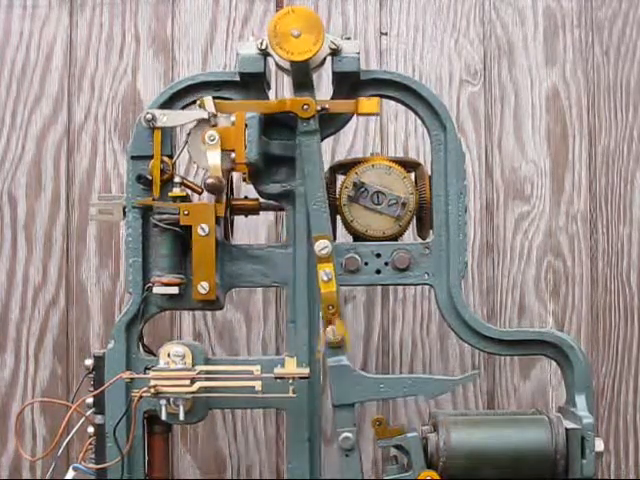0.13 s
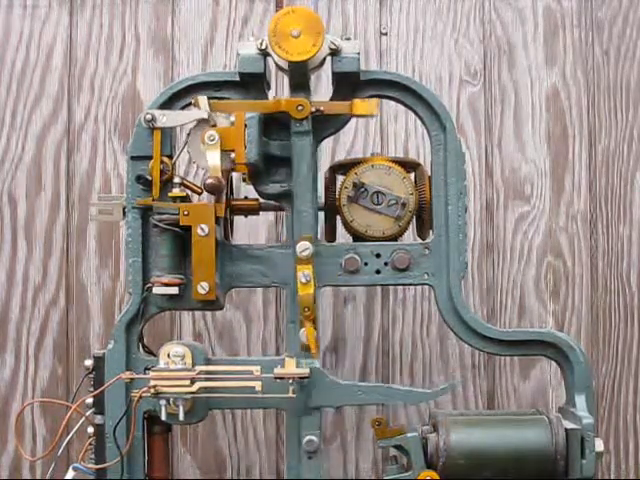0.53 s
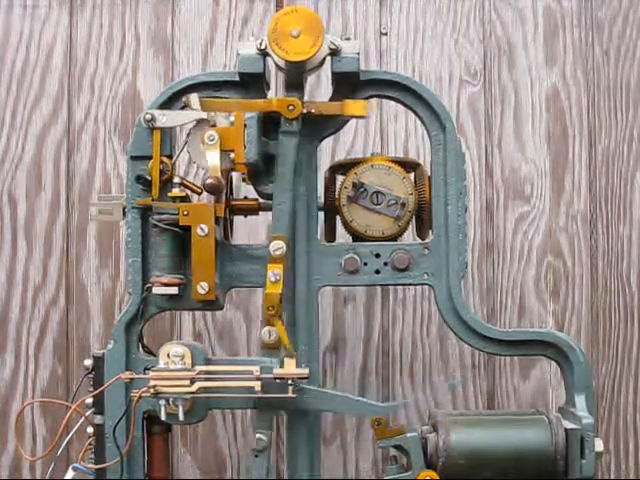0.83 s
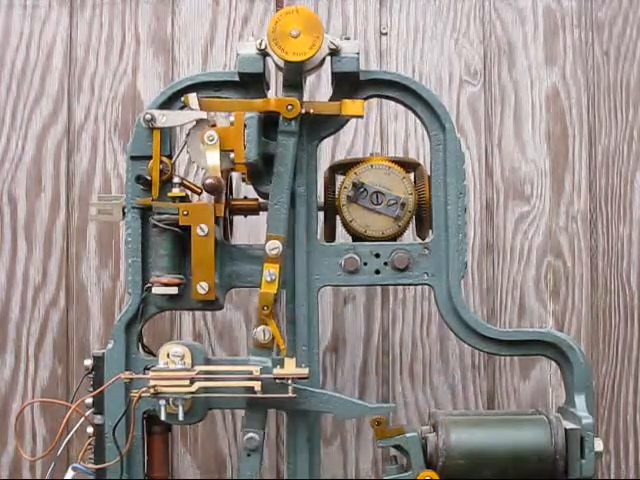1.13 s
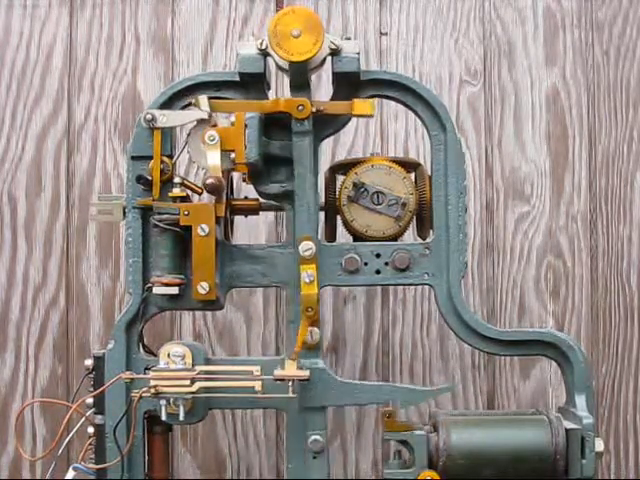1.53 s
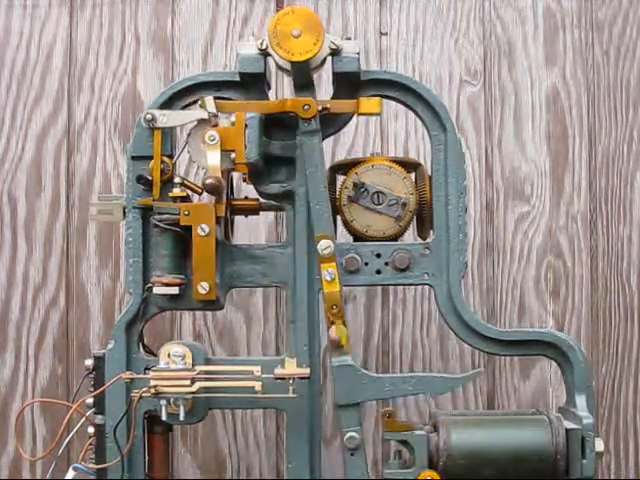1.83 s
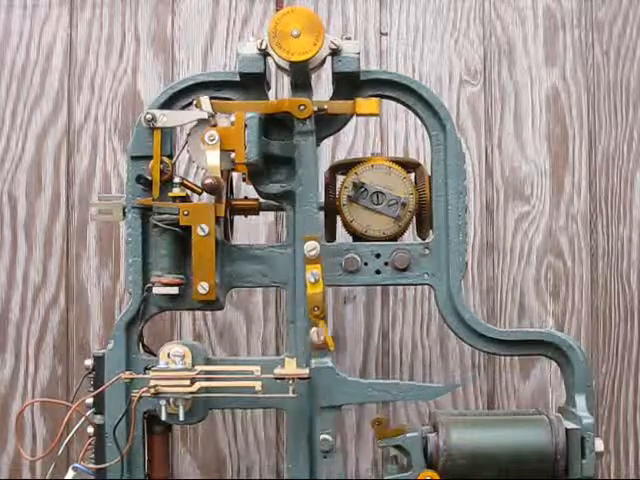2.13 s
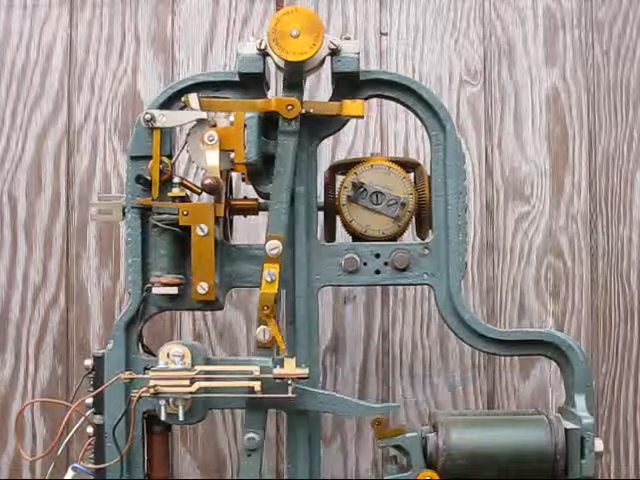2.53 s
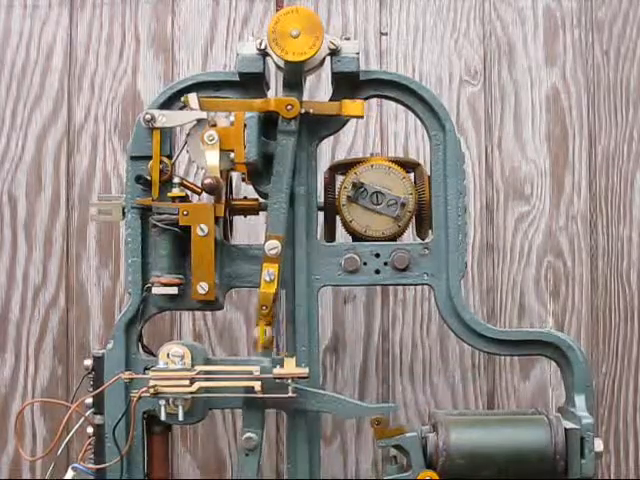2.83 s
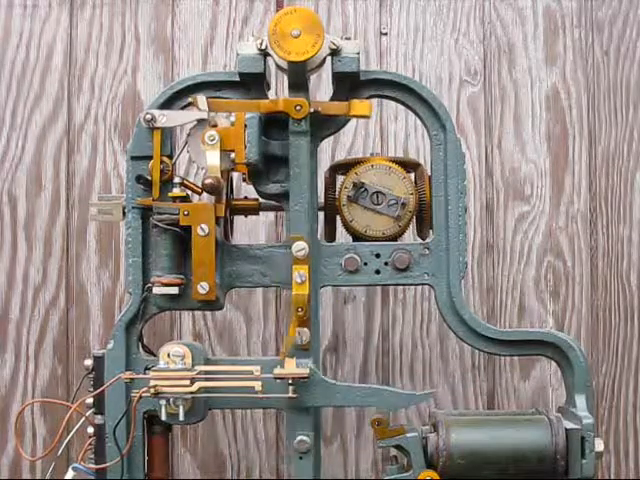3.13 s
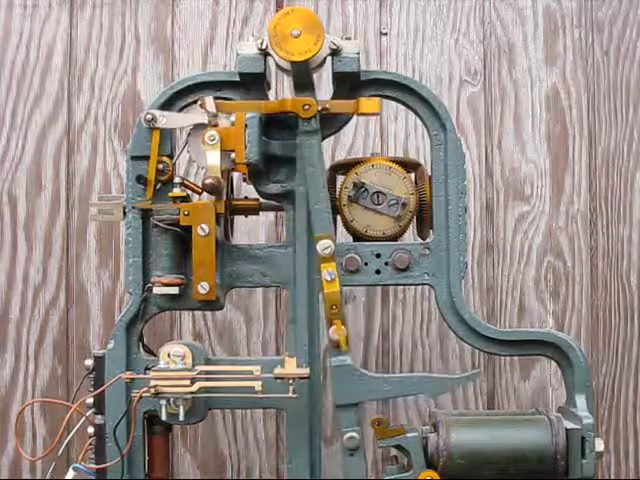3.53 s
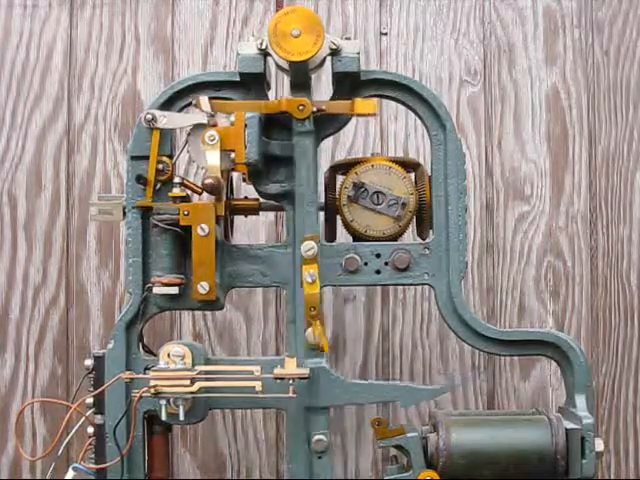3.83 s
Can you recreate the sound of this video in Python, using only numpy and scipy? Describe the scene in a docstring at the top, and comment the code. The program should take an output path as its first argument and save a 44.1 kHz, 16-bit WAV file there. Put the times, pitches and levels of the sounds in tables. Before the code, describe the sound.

Wind buffets the microphone throughout, in lumpy low gusts and hard puffs, strongest near 0.2 and 2.6 s, easing after 3.4 s, over steady rumble and faint hiss. A pendulum clock makes irregular bright ticks, some with a brief high spring ring, until 3.3 s. Metal levers clack dully at 1.5, louder at 2.13, sharply at 3.24, faintly at 3.95. Soft rubbing hisses from 2.6 to 3.4 s.

```python
"""Wind buffets a microphone from the start: gusts of lumpy noise and hard puffs, over a steady low rumble and
faint hiss. An electric pendulum clock ticks through it: bright noise snaps, with two decaying sines for the
pawl and contact springs. From 1.5 s levers clack on the iron frame, and at 3.24 s a magnet resets: noise bursts
for thud, knock and crack, and decaying sines for the modes. From 2.6 s something rubs softly for a moment: hiss
with gliding narrow-band noise. The loudest peaks drive a limiter."""
import sys
import numpy as np
from scipy import signal
from scipy.fft import rfft, irfft
from scipy.io import wavfile
from scipy.ndimage import uniform_filter1d, minimum_filter1d

SR = 44100
rng = np.random.default_rng(int(sys.argv[2]) if len(sys.argv) > 2 else 0)


def transcribe(signal):
    """Save signal, clipped to [-1, 1], as a 16-bit WAV file at the path in sys.argv[1]."""
    frames = np.atleast_2d(signal).T
    limited = np.clip(frames, -1, 1)
    pcm = np.round(limited * 32767).astype(np.int16)
    wavfile.write(sys.argv[1], SR, pcm)


N = 176400


def from_db(db):
    """Decibels to amplitude gain."""
    return 10 ** (np.asarray(db) / 20)


def rms_one(x):
    """Scale to unit rms."""
    return x / np.sqrt(np.mean(x ** 2) + 1e-20)


def in_time(rows):
    """Interpolate each column after t/s at every sample."""
    t_s, *columns = np.transpose(rows)
    return [np.interp(np.arange(N) / SR, t_s, column) for column in columns]


def colour(x, spectrum):
    """Filter by a spectrum, dB linear in log f; white noise keeps its power."""
    f_hz, density_db = np.transpose(spectrum)
    bins_hz = np.arange(N // 2 + 1) * SR / N + 1e-3
    gain = from_db(np.interp(np.log(bins_hz), np.log(f_hz), density_db))
    return irfft(rfft(x) * rms_one(gain), N)


def noise(spectrum):
    """Coloured Gaussian noise of unit rms."""
    return colour(rng.standard_normal(N), spectrum)


def drift(hz):
    """Smooth random motion of unit rms: white noise through a double real pole."""
    r = np.exp(-2 * np.pi * hz / SR)
    settled = signal.lfilter([1], [1, -2 * r, r * r], rng.standard_normal(N + SR))[SR:]
    return rms_one(settled)


def strikes(t_s, level_db):
    """One impulse per blow."""
    hits = np.zeros(N)
    hits[np.clip((t_s * SR).astype(int), 0, N - 1)] = from_db(level_db)
    return hits + 1e-18


def ring(hits, hz, t60_s):
    """Damped resonator: a unit impulse starts a decaying sine of height 1."""
    r = from_db(-60 / (t60_s * SR))
    w = 2 * np.pi * hz / SR
    return signal.lfilter([0, np.sin(w)], [1, -2 * r * np.cos(w), r * r], hits)


def decaying_power(hits, t60_s):
    """Power that jumps at each blow and falls 60 dB in t60."""
    return signal.lfilter([1], [1, -from_db(-120 / (t60_s * SR))], hits ** 2)


def burst(hits, spectrum, t60_s, tail_db, tail_t60_s):
    """Countless short modes: noise that dies fast after each blow, plus a weaker, longer tail."""
    fast = decaying_power(hits, t60_s)
    slow = decaying_power(hits, tail_t60_s)
    return noise(spectrum) * np.sqrt(fast + from_db(tail_db) ** 2 * slow)


def turbulence(spectrum, lumps):
    """Lumpy noise with its power evened out over a few hundredths of a second."""
    x = colour(rng.standard_normal(N) * lumps, spectrum)
    power = uniform_filter1d(uniform_filter1d(x ** 2, size=1100), size=1100)
    return x / np.sqrt(power + 1e-9)


# air strength at the microphone, before layer offsets: t/s, level/dB
GUST_LEVEL = [(0.0, -23.5), (.15, -16), (.27, -23.5), (.38, -28), (.42, -21), (.57, -25), (.68, -23),
              (.72, -28), (.85, -23), (1.12, -21), (1.16, -49), (1.29, -20.5), (1.44, -18.5), (1.5, -37.5),
              (1.58, -24), (1.98, -37.5), (2.11, -19.5), (2.16, -39), (2.21, -15), (2.34, -16.5),
              (2.37, -42), (2.46, -19.5), (2.52, -45), (2.6, -14.5), (2.87, -34.5), (3.05, -18), (3.2, -22),
              (3.27, -41), (3.38, -22.5), (3.42, -49), (3.75, -45.5), (3.87, -27.5), (4.0, -32.5)]
# relative power densities of the three wind layers: f/Hz, density/dB
BUFFET_SPECTRUM = [(50, -15), (110, -2.5), (180, 1.5), (310, 1.5), (450, -8), (650, -17.5), (1300, -65)]
RUMBLE_SPECTRUM = [(20, -38), (50, -12), (100, -3.5), (150, -3), (260, -11.5), (600, -87)]
FLUTTER_SPECTRUM = [(250, -10), (420, -1.5), (550, -6), (800, -9), (1100, -19.5), (1600, -34), (5000, -72)]
BUFFET_DB, RUMBLE_DB, FLUTTER_DB = -0.5, -6.5, -13.5  # re gust
# small, quick eddies flutter; big, slow ones rumble
EDDY_HZ, RUMBLE_DB_PER_OCTAVE, FLUTTER_DB_PER_OCTAVE = 321.4, -16.5, 18
LUMPS_HZ, LUMPY_DB = 72, 5
SWIRL_HZ, BUFFET_SWIRL_DB, FLUTTER_SWIRL_DB = 38, 2.5, 5.5


def wind():
    """Gusts break into swirls at the microphone that swing the flutter more than the buffeting and rumble."""
    gust_db, = in_time(GUST_LEVEL)
    _, puff_hz = in_time(PUFF_EVENTS)
    octaves = uniform_filter1d(np.log2(puff_hz / EDDY_HZ), size=3000)
    rumble_db = RUMBLE_DB + RUMBLE_DB_PER_OCTAVE * octaves
    flutter_db = FLUTTER_DB + FLUTTER_DB_PER_OCTAVE * octaves
    lumps = from_db(LUMPY_DB * drift(LUMPS_HZ))
    swirl = drift(SWIRL_HZ)
    swirl = rms_one(np.tanh(swirl - uniform_filter1d(swirl, size=3000)))
    layers = [(BUFFET_DB, BUFFET_SPECTRUM, BUFFET_SWIRL_DB),
              (rumble_db, RUMBLE_SPECTRUM, BUFFET_SWIRL_DB),
              (flutter_db, FLUTTER_SPECTRUM, FLUTTER_SWIRL_DB)]
    out = np.zeros(N)
    for layer_db, spectrum, swing_db in layers:
        swing = rms_one(from_db(swing_db * swirl))
        out += from_db(gust_db + layer_db) * swing * turbulence(spectrum, lumps)
    return out


# relative power density of the background: f/Hz, density/dB
BACKGROUND_SPECTRUM = [(20, -10.5), (70, 6), (140, -1), (280, -22), (600, -12.5), (900, -13), (1500, -20),
                       (2600, -25), (5000, -30), (11400, -35.5), (16000, -47.5)]
BACKGROUND_DB = -38  # rms


def background():
    """Low rumble and faint hiss: steady coloured noise."""
    return from_db(BACKGROUND_DB) * noise(BACKGROUND_SPECTRUM)


# pawl and springs: t/s, snap level/dB, lower ring level/dB, upper ring level/dB
TICK_EVENTS = [(.006, -23, -29, -43), (0.681, -41, -26.5, -29), (.754, -37, -39, -46),
               (0.957, -25.5, -36, -45), (1.34, -35.5, -45, -49), (2.3306, -27.5, -26.5, -30.5),
               (2.432, -29.5, -36, -51), (2.4558, -42.5, -43, -62), (2.593, -29, -41, -49),
               (2.609, -33.5, -48, -54), (2.997, -31, -36, -43), (3.168, -27, -30, -32),
               (3.339, -26.5, -33.5, -54)]
# lower and upper spring ring: f/Hz, t60/s
SPRING_RINGS = [(4600, 0.046), (5884, 0.08)]
# relative power densities of the plain snap and of the upper ring's snap: f/Hz, density/dB
SNAP_SPECTRUM = [(3000, -1.5), (6800, -19), (8300, 10), (9800, -1.5), (11500, 3), (13200, -11),
                 (16000, -28)]
SPRING_SNAP_SPECTRUM = [(3000, -11), (7000, -10), (12000, -7), (16000, -9)]
SPRING_SNAP_DB = 2.5  # re upper ring
SNAP_T60_S, SNAP_TAIL_DB, SNAP_TAIL_T60_S = 0.018, -14.5, 0.11


def ticks():
    """A bright snap leaves a spring ringing on two notes; the upper note brings a broader snap."""
    t_s, snap_db, lower_db, upper_db = np.transpose(TICK_EVENTS)
    out = np.zeros(N)
    for level_db, (hz, t60_s) in zip((lower_db, upper_db), SPRING_RINGS):
        out += ring(strikes(t_s, level_db), hz, t60_s)
    snaps = (snap_db, SNAP_SPECTRUM), (upper_db + SPRING_SNAP_DB, SPRING_SNAP_SPECTRUM)
    for level_db, spectrum in snaps:
        out += burst(strikes(t_s, level_db), spectrum, SNAP_T60_S, SNAP_TAIL_DB, SNAP_TAIL_T60_S)
    return out


def eddy(t_s, hz):
    """One passing swirl: a pressure swing of about one cycle, random in phase."""
    envelope = 1 / np.cosh(np.clip(hz * t_s / PUFF_WIDTH_CYCLES, -30, 30))
    return np.cos(2 * np.pi * (hz * t_s + rng.random())) * envelope


# single hard puffs: t/s, relative level/dB, centre f/Hz
PUFF_EVENTS = [(.008, -10, 400), (.040, -6.5, 456), (.077, -18, 410), (0.136, -3.5, 480), (.164, -7.5, 440),
               (.227, 6.5, 275), (0.255, -5, 590), (.307, -1.5, 460), (0.345, -10, 294),
               (0.394, -15.5, 423), (.427, -7, 325), (0.454, -6.5, 343), (0.495, -7.5, 283),
               (.520, -12, 370), (0.622, -15.5, 270), (0.668, -2.5, 282), (.708, -11.5, 383),
               (0.83, -7.5, 330), (0.879, -7.5, 255), (.925, -11, 246), (.968, -13.5, 366),
               (1.037, -5, 344), (1.068, -13.5, 302), (1.086, -5, 314), (1.117, -5.5, 354),
               (1.22, -12, 364), (1.278, -2.5, 338), (1.312, -8, 318), (1.341, -5, 314), (1.401, -3.5, 320),
               (1.47, -10.5, 335), (1.564, -5.5, 228), (1.641, -4, 380), (1.792, -11, 198),
               (2.049, -7, 215), (2.118, -7.5, 254), (2.205, -8.5, 430), (2.213, -3.5, 330),
               (2.24, -3.5, 270), (2.257, -10, 500), (2.306, -2.5, 460), (2.325, -6, 550), (2.35, -9, 247),
               (2.45, -8.5, 291), (2.594, -2.5, 313), (2.616, 3.5, 334), (2.688, -21, 217),
               (2.758, -7.5, 190), (2.81, -8.5, 226), (2.951, -6, 232), (3.022, -3, 185), (3.03, -1.5, 377),
               (3.073, -10, 263), (3.186, -4.5, 216), (3.205, -6, 228), (3.349, -9, 221), (3.393, -7, 284),
               (3.56, -19.5, 212), (3.629, -20.5, 230), (3.889, -11.5, 258), (3.975, -4.5, 233)]
PUFF_DB, PUFF_WIDTH_CYCLES, PUFF_LOW_CUT_HZ = 3.5, 0.2, 71
WAKE_DB, WAKE_MAX_S, WAKE_MAX_OCTAVES = -9, 0.005975, 0.94  # re main eddy


def puffs():
    """Each hard puff is a big eddy with a weaker one before and after."""
    out = np.zeros(N)
    reach = SR // 40
    for puff_s, level_db, hz in PUFF_EVENTS:
        at = np.arange(max(int(puff_s * SR) - reach, 0), min(int(puff_s * SR) + reach, N))
        t_s = at / SR - puff_s
        wake = 0
        for side in (-1, 1):
            offset_s = side * WAKE_MAX_S * (1 + rng.random()) / 2
            wake_hz = hz * 2 ** (WAKE_MAX_OCTAVES * (2 * rng.random() - 1))
            wake = wake + eddy(t_s + offset_s, wake_hz)
        out[at] += from_db(level_db + PUFF_DB) * (eddy(t_s, hz) + from_db(WAKE_DB) * wake)
    low_cut = signal.butter(1, PUFF_LOW_CUT_HZ, "high", fs=SR, output="sos")
    return signal.sosfilt(low_cut, out + 1e-18)


def swell(hits, rise_s):
    """A heavy body takes a moment to build up its sound: smoothed power of the blows."""
    r = np.exp(-1 / (rise_s * SR))
    return np.sqrt(signal.lfilter([1 - r], [1, -r], hits ** 2))


# lever and magnet blows, relative: t/s, thud level/dB, knock level/dB, crack level/dB, crack top level/dB
CLACK_EVENTS = [(1.488, -23.5, -27.5, -34, -53), (1.526, -51, -55, -38.5, -40), (1.532, -57, -60, -35, -36),
                (1.573, -20, -26.5, -37, -46), (2.134, -12, -12.5, -14.5, -25),
                (2.165, -16.5, -22.5, -27, -38), (3.2408, -51, -21, -15.5, -7.5),
                (3.246, -18, -29.5, -26.5, -22), (3.269, -27, -30, -32, -44), (3.301, -33, -38, -39, -60),
                (3.93, -38.5, -33.5, -34.5, -42), (3.968, -41, -37, -33, -43)]
# modes of iron frame and levers: f/Hz, relative level/dB, t60/s
FRAME_MODES = [(880, -12, .05), (1105, -5, .05), (1160, -8, .12), (1228, -8, .16), (1330, -10, .1),
               (1426, -10, .11), (1593, -10, .1), (1879, -7, .12), (1943, -10, .1), (2198, -10, .09),
               (2655, -11, .11), (3176, -11, .07), (3273, -12, .07)]
# relative power densities of the four bursts: f/Hz, density/dB
THUD_SPECTRUM = [(450, -42), (750, 1.5), (1150, 15.5), (1420, 6), (1800, 0), (3000, -64)]
KNOCK_SPECTRUM = [(1200, -3), (1850, 3), (2300, 2.5), (2700, -3), (3200, 0), (3900, -25), (8000, -29)]
CRACK_SPECTRUM = [(2000, -20), (3600, -2.5), (4600, 2), (6500, -5), (7600, -1.5), (9000, -25), (16000, -52)]
CRACK_TOP_SPECTRUM = [(5500, -76), (8000, -3), (11300, 10.5), (13300, 6), (16000, -8)]
FRAME_RING_DB, MODE_SPREAD_DB, KNOCK_ABOVE_HZ = -3.5, 1.5, 1600
BODY_DB, BODY_SWELL_S = -1.5, .003  # thud and knock
BODY_T60_S, BODY_TAIL_DB, BODY_TAIL_T60_S = 0.053, -20.5, 0.26
CRACK_T60_S, CRACK_TAIL_DB, CRACK_TAIL_T60_S = 0.018, -20, 0.17
TOP_T60_S, TOP_TAIL_DB, TOP_TAIL_T60_S = 0.01, -24.5, 0.17


def clacks():
    """Metal meets metal with a crack; the frame answers with a thud, a higher knock and its modes."""
    t_s, thud_db, knock_db, crack_db, top_db = np.transpose(CLACK_EVENTS)
    modes = np.zeros(N)
    for k, (hz, mode_db, t60_s) in enumerate(FRAME_MODES):
        blow_db = knock_db if hz > KNOCK_ABOVE_HZ else thud_db
        blow_db = blow_db + MODE_SPREAD_DB * rng.standard_normal(len(t_s))
        modes += (-1) ** k * ring(strikes(t_s, blow_db + mode_db), hz, t60_s)
    body = np.zeros(N)
    for level_db, spectrum in ((thud_db, THUD_SPECTRUM), (knock_db, KNOCK_SPECTRUM)):
        hits = swell(strikes(t_s, level_db + BODY_DB), BODY_SWELL_S)
        body += burst(hits, spectrum, BODY_T60_S, BODY_TAIL_DB, BODY_TAIL_T60_S)
    crack = burst(strikes(t_s, crack_db), CRACK_SPECTRUM, CRACK_T60_S, CRACK_TAIL_DB, CRACK_TAIL_T60_S)
    top = burst(strikes(t_s, top_db), CRACK_TOP_SPECTRUM, TOP_T60_S, TOP_TAIL_DB, TOP_TAIL_T60_S)
    return from_db(FRAME_RING_DB) * modes + body + crack + top


# rubbing strength, rms of the hiss: t/s, level/dB
RUB_STRENGTH = [(2.56, -76), (2.64, -52.5), (3.33, -54.5), (3.44, -68)]
# relative power density of the hiss: f/Hz, density/dB
RUB_SPECTRUM = [(3000, -18), (4200, 11), (4800, 7), (6800, -3), (9000, -34)]
# resonances that glide up again and again: starting f/Hz
WHIRR_STARTS_HZ = [4200, 4800]
WHIRRS_PER_S, WHIRR_RISE_OCTAVES, WHIRR_WIDTH_HZ, WHIRR_DB = 9, .2, 90, -2  # mean rate; dB re hiss


def rubbing():
    """A part slides lightly and unevenly: soft hiss with narrow noise bands that glide up, swell and fade."""
    level_db, = in_time(RUB_STRENGTH)
    whirr = np.zeros(N)
    for start_hz in WHIRR_STARTS_HZ:
        rate_hz = WHIRRS_PER_S * (1 + drift(WHIRRS_PER_S) / 2)
        slide = np.cumsum(rate_hz) / SR % 1  # 0 to 1 over each glide
        phase = 2 * np.pi * np.cumsum(start_hz * 2 ** (WHIRR_RISE_OCTAVES * slide)) / SR
        band = drift(WHIRR_WIDTH_HZ) * np.cos(phase) + drift(WHIRR_WIDTH_HZ) * np.sin(phase)
        whirr += np.sin(np.pi * slide) * band
    return from_db(level_db) * (noise(RUB_SPECTRUM) + from_db(WHIRR_DB) * rms_one(whirr))


def scene():
    """Air, background and clock summed at one microphone."""
    return (wind() + background() + ticks() + puffs() + clacks() + rubbing())[None]


LIMIT_DB, RELEASE_DB_PER_S = 3, 50  # re full scale
PEAK_LIMIT, CUTOFF_HZ = 1.06, 16000


def record(dry):
    """Overload ducks the gain, which recovers slowly; a fast limiter and a clip hold peaks; the top is cut."""
    over_db = np.maximum(20 * np.log10(np.abs(dry[0]) + 1e-9) - LIMIT_DB, 0)
    ramp_db = RELEASE_DB_PER_S * np.arange(N) / SR
    duck_db = np.maximum.accumulate(over_db + ramp_db) - ramp_db  # peak hold, linear release in dB
    held = dry * from_db(-uniform_filter1d(duck_db, size=16))
    peak_gain = PEAK_LIMIT / np.maximum(np.abs(held), PEAK_LIMIT)
    peak_gain = uniform_filter1d(minimum_filter1d(peak_gain, size=120), size=120)
    held = np.clip(held * peak_gain, -1, 1)
    top_cut = signal.ellip(12, .1, 90, CUTOFF_HZ, fs=SR, output="sos")
    return signal.sosfilt(top_cut, held)


dry = scene()
out = record(dry)
transcribe(out)
```